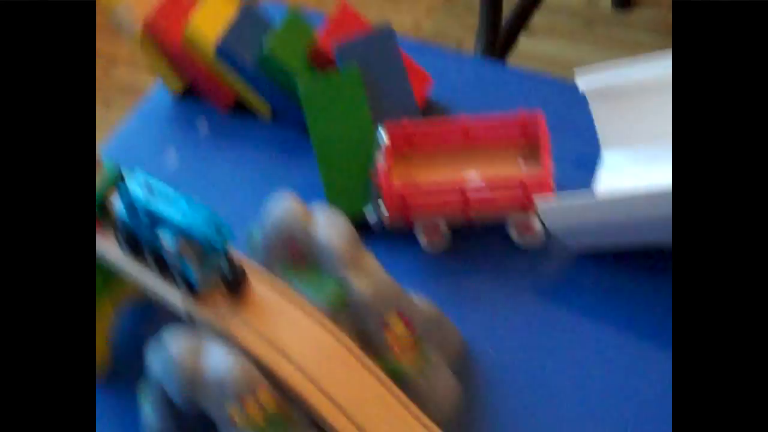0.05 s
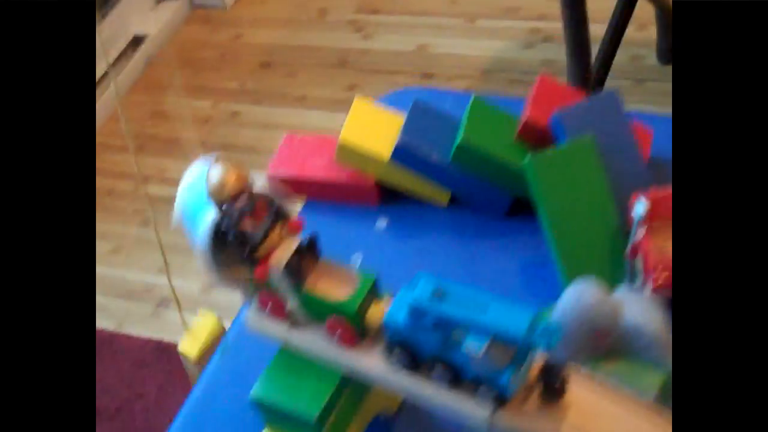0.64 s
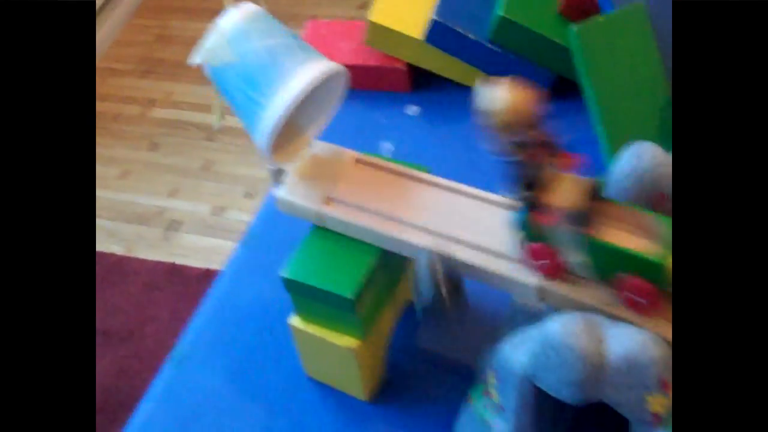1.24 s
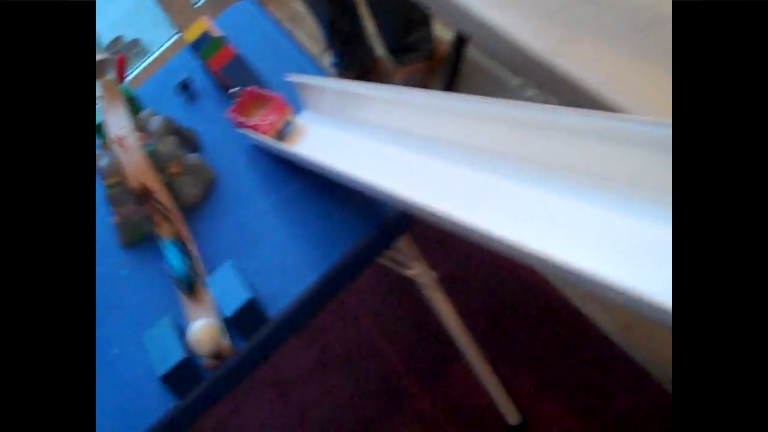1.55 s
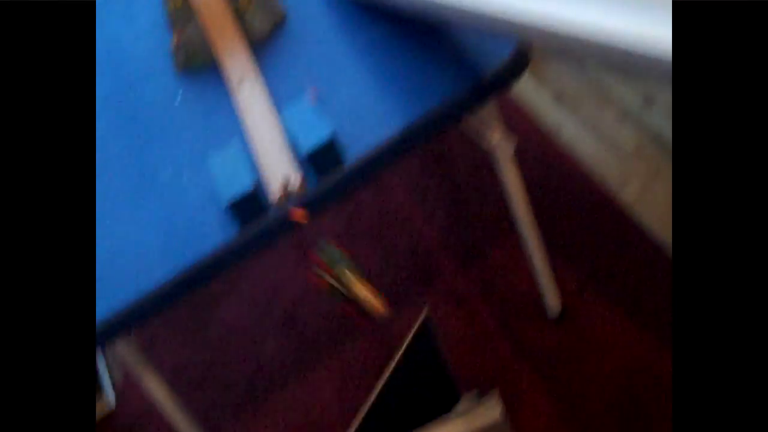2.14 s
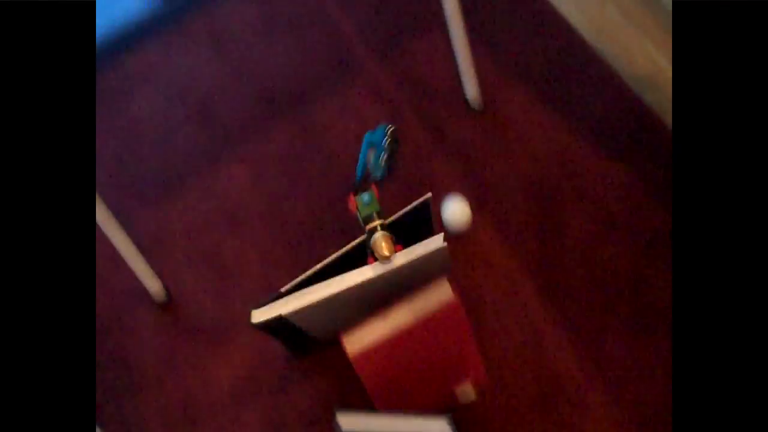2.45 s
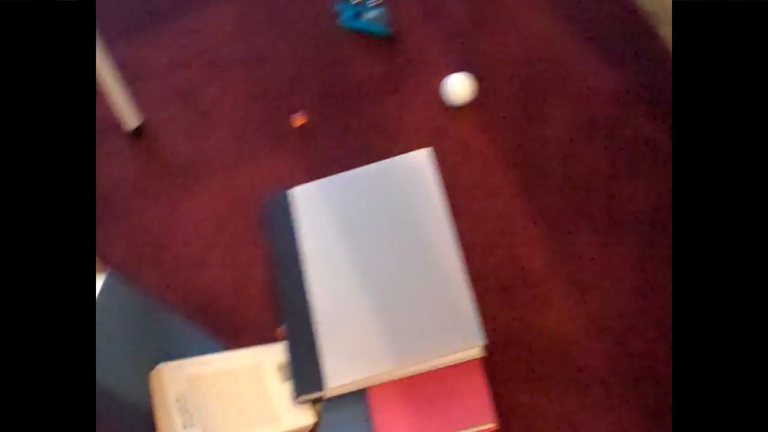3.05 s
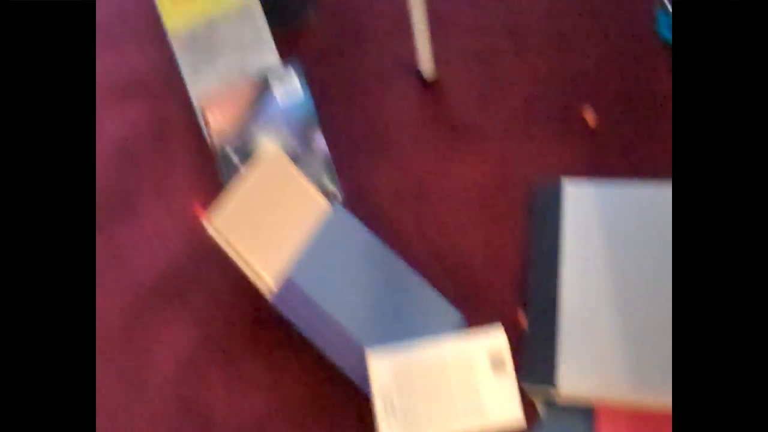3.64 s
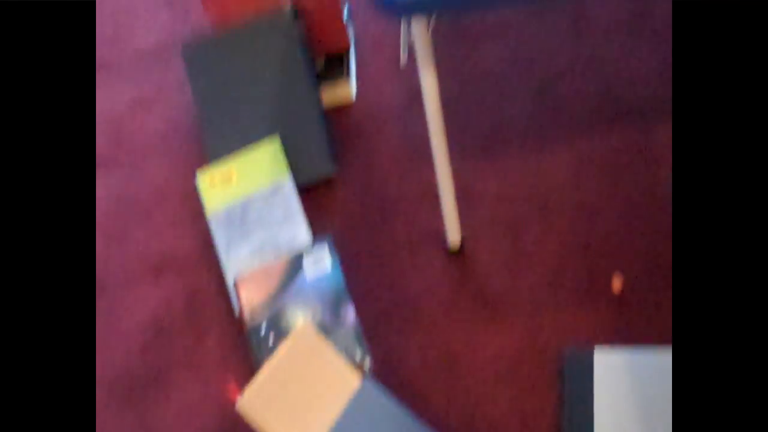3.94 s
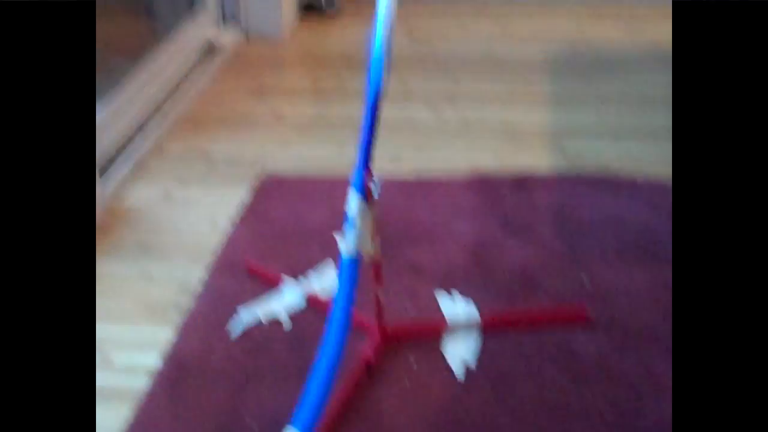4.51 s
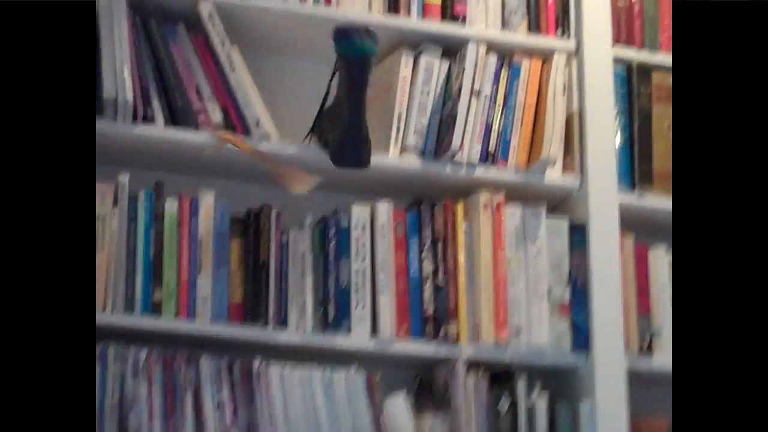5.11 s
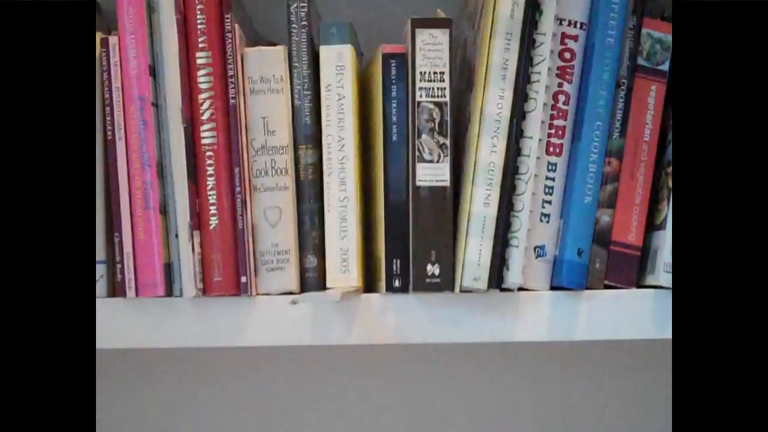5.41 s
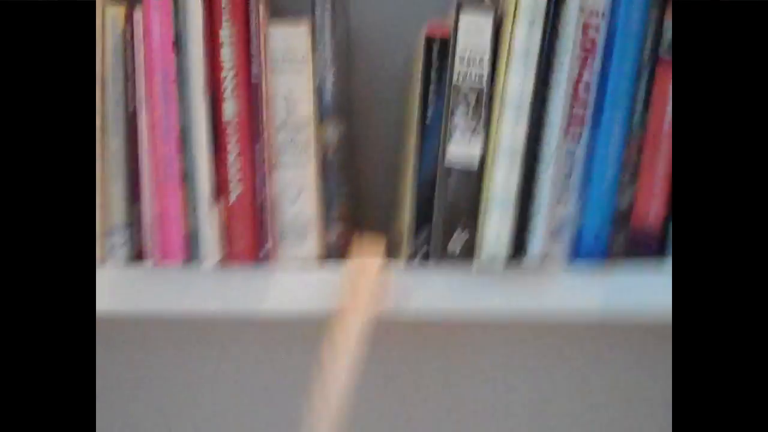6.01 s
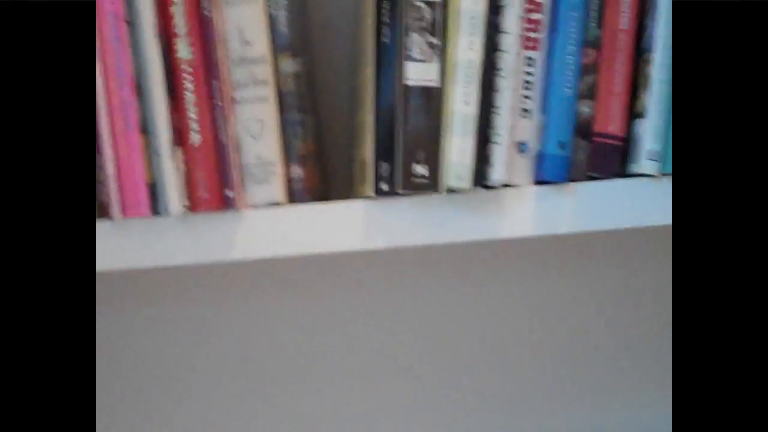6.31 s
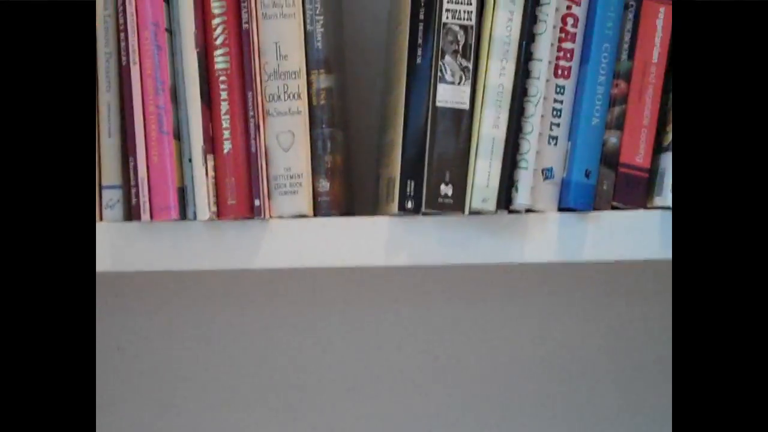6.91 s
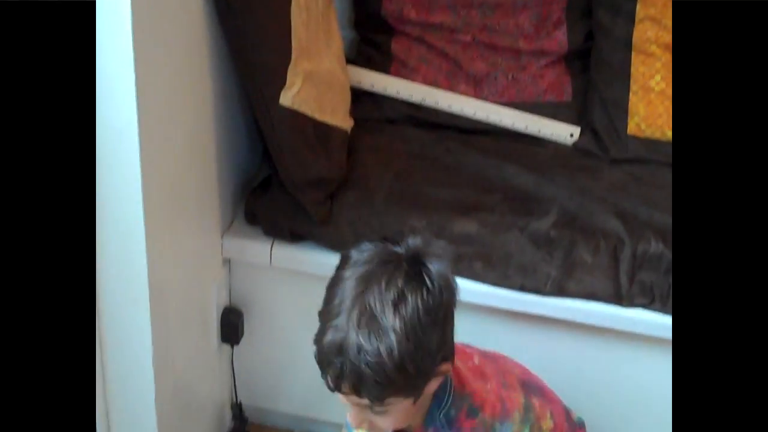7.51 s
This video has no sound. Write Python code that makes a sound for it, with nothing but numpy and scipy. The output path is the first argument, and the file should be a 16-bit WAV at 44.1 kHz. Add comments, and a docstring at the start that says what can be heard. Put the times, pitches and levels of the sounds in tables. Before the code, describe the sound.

A household chain reaction starts with knocking blocks, small clicks and the rattle of toy wagons and a ball rolling over wood. Then books topple onto carpet in an uneven run of thuds, ending in low booms. A sharp balloon pop rings through the room, followed by a tumbling book, a clattering wooden stick and a soft rustle of clothing. The stereo microphone is close, with light hiss and slight overload on loud blows.

```python
"""Chain reaction in a living room

Blocks topple and a toy train rolls over a play table, toys clack off it, books fall like dominoes
on the carpet, a balloon bursts, a book and a wooden stick tumble from a shelf; then clothes rustle.
Each blow is a cluster of dying modes with the room's answer behind it. The stereo microphone is
hand-held, close to the action, and overloads on the loud blows."""
import sys
import numpy as np
from scipy import signal
from scipy.fft import rfft, irfft, next_fast_len
from scipy.io import wavfile
from scipy.ndimage import map_coordinates

SR = 44100
rng = np.random.default_rng(int(sys.argv[2]) if len(sys.argv) > 2 else 0)


def transcribe(signal):
    """Save signal, clipped to [-1, 1], as a 16-bit WAV file at the path in sys.argv[1]."""
    frames = np.atleast_2d(signal).T
    limited = np.clip(frames, -1, 1)
    pcm = np.round(limited * 32767).astype(np.int16)
    wavfile.write(sys.argv[1], SR, pcm)


N = 342204
TIME = np.arange(N) / SR
AGE = np.arange(SR // 2) / SR  # time since a blow [s]
# the knock of wood or a book's board: (frequency [Hz], level [dB])
KNOCK_SPECTRUM = [(150, -37), (380, -1), (520, 1), (1200, 0), (2500, -5), (3300, -8), (6000, -37)]


def toys():
    """Blocks knock on the play table, the creeping train ticks, wagons and ball clack down and off it."""
    # blocks and train: (time [s], strength [dB], hardness [dB], knock [Hz], relative table thud [dB])
    knocks = [(.074, -22, -8, 2350, -0.5), (0.0924, -9, 3.5, 2440, -18), (.128, -14.5, -13.5, 496, -9),
              (.194, -8, -5, 1786, -6.5), (.231, -14, -8, 1750, -9.5), (1.163, -1, 1, 2734, -18.5),
              (1.189, -8.5, 0, 520, -11), (1.285, -13, -4, 1710, -3), (1.299, -1.5, -0.5, 999, -18.5),
              (1.382, -12.5, -8.5, 944, -6)]
    # couplings and wheels: (time [s], strength [dB], hardness [dB], click [Hz])
    ticks = [(.412, -35, 12, 3430), (0.5493, -25.5, 32, 6930), (.557, -34.5, 38, 6840),
             (.6696, -25, 13.5, 7400), (.674, -24, 16, 7800), (.748, -39, 14, 4600),
             (0.8396, -6.5, 27, 7350), (0.8444, -10.5, 24, 6780), (.861, -20, 10, 5800),
             (.93, -17, 5.5, 6430), (.936, -24, -2.5, 6860), (.964, -15, 17.5, 6800), (1.041, -26, 3, 7140),
             (1.0636, -19.5, 0.5, 4940), (1.15, -29, 12, 6800)]
    # wagons and ball: (time [s], strength [dB], hardness [dB], knock [Hz], click [Hz])
    clacks = [(1.504, -17.5, -3, 2590, 5590), (1.538, -12.5, 1, 2560, 7410), (1.57, -17.5, -5, 2640, 7780),
              (1.621, -15, 19.5, 520, 3620), (1.636, -10, 12, 1980, 6640), (1.687, -5.5, 4, 2766, 3690),
              (1.759, -11.5, -6.5, 1776, 3400), (1.899, -16, -8.5, 2542, 6840),
              (1.986, -19.5, 0, 1490, 3570), (2.005, -17.5, 6, 2020, 5000), (2.033, -8, 29, 1860, 7350),
              (2.061, -14.5, 9, 780, 7570), (2.142, -26.5, -6, 1890, 7280), (2.181, -14, 17.5, 2480, 6790),
              (2.19, -13, 23.5, 2480, 7700), (2.23, -7, 6.5, 2822, 6600), (2.396, -17, -12, 1383, 6470),
              (2.48, -14.5, 21, 1740, 7900), (2.486, -20, 19, 1750, 7400)]
    out = np.zeros((2, N))
    for s, db, hardness_db, knock_hz, thud_db in knocks:
        knock = toy_hit(hardness_db, knock_hz, click_hz=2892, thud_db=thud_db,
                        base_life=.081, shorten=.35, ring_db=-11.5, ring_life=.67)
        add(out, s, amp(db) * knock, room_share(-6, db))
    for s, db, hardness_db, click_hz in ticks:
        tick = toy_hit(hardness_db, knock_hz=1883, click_hz=click_hz, thud_db=-9.5,
                       base_life=.021, shorten=.12, ring_db=-5, ring_life=.52)
        add(out, s, amp(db) * tick, room_share(-12.5, db))
    for s, db, hardness_db, knock_hz, click_hz in clacks:
        clack = toy_hit(hardness_db, knock_hz, click_hz, thud_db=-25,
                        base_life=.064, shorten=.04, ring_db=-7.5, ring_life=.82)
        add(out, s, amp(db) * clack, room_share(-1.5, db))
    return out


def toy_hit(hardness_db, knock_hz, click_hz, thud_db, base_life, shorten, ring_db, ring_life):
    """Hardness shifts a blow from knock to click and shortens it; the table top booms under it."""
    # the table top's main modes: (frequency [Hz], level [dB], t60 [s])
    top_modes = [(206, 1, 0.24), (324, -13, 0.26), (423, -8, 0.31), (485, -7.5, 0.16), (510, -17.5, 0.18)]
    # its dense modes, and the toy's click: (frequency [Hz], level [dB])
    top_spectrum = [(60, -49), (110, -31), (180, 6), (500, 3), (750, -26), (2000, -79.5)]
    click_spectrum = [(1200, -44), (2300, -2.5), (3000, -1.5), (5000, 3), (7500, 5), (9000, -5),
                      (13000, -16.5), (16000, -29)]
    life = base_life * amp(-shorten * hardness_db)
    top = amp(-.5) * ring(top_modes, scatter_db=4) + amp(-1) * cluster(top_spectrum, .13, .00062)
    thud = amp(thud_db) * lowcut(top, hz=135, order=3)
    knock = contact(KNOCK_SPECTRUM, 1.39 * life, .0001, knock_hz, 5, ring_db, ring_life)
    click = contact(click_spectrum, .64 * life, .00005, click_hz, 7.5, ring_db, 1.6 * ring_life)
    return (thud + knock + amp(hardness_db) * click) / np.hypot(1, amp(hardness_db))


def books():
    """Books and props fall on the carpet; hardness tilts each fall from thud to slap."""
    # falls: (time [s], strength [dB], hardness [dB], thud [Hz], knock t60 [s])
    falls = [(2.3964, -21.5, 3, 474, 0.04), (2.61, -28, 5.5, 362, 0.07), (2.671, -28.5, 15.5, 425, 0.17),
             (2.736, -24, 4, 420, 0.48), (2.759, -13.5, 4.5, 197, 0.018), (2.766, -15, 7, 400, 0.041),
             (2.82, -30.5, 21.5, 367, .08), (2.877, -36, -4, 340, .06), (2.954, -39.5, 13, 384, 0.08),
             (3.004, -37.5, 18, 378, 0.13), (3.105, -35, 7, 310, 0.16), (3.134, -16, 6, 425, 0.27),
             (3.17, -24.5, -4.5, 560, .15), (3.294, -40.5, 26.5, 310, .04), (3.37, -34.5, 12, 370, 0.063),
             (3.409, -30.5, -7.5, 390, 0.012), (3.491, -23, -11.5, 340, 0.039), (3.515, -30, -5, 148, 0.15),
             (3.656, -49, -32, 357, 0.15), (3.783, -34, -16, 287, 0.13), (4.231, -23.5, -1.5, 253, 0.11),
             (4.254, -34.5, 28, 330, .08), (4.446, -23.5, -13, 272, 0.03), (4.453, -18, 6.5, 293, 0.32),
             (4.47, -27, 23.5, 300, .12), (4.488, -26.5, 3.5, 560, .016), (4.505, -18, -6, 283, 0.029),
             (4.544, -17.5, -7.5, 320, 0.015), (4.661, -39, 15.5, 208, 0.48), (4.819, -19, -5, 219, 0.32),
             (5.277, -39, 2, 236, .16), (5.375, -42, -8, 327, .19), (7.052, -50.5, -10, 170, .03)]
    out = np.zeros((2, N))
    for s, db, hardness_db, hz, t60 in falls:
        fall = landing(thud_db=-hardness_db / 2, thud_hz=hz, thud_t60=.21, knock_db=-.5,
                       knock_hz=2.52 * hz, knock_t60=t60, peak_db=3.5, slap_db=hardness_db / 2)
        add(out, s, amp(db) * fall, room_share(-9.5, db))
    return out


def balloon():
    """The skin rips with a bang that leaves the whole room ringing."""
    # the burst, and the room ringing after it: (frequency [Hz], level [dB])
    burst_spectrum = [(18, -46), (30, -18), (243, 1), (365, -3.5), (534, -1.5), (745, -6.5), (1630, -3),
                      (2390, -11.5), (7660, -6.5), (8840, -15), (11500, -24), (19400, -120)]
    ringing_spectrum = [(88, -33), (150, -12.5), (246, 1.5), (312, -8), (455, -34), (708, 0), (826, -5.5),
                        (1500, 1), (3070, -12), (7200, -7), (8840, -17.5), (11500, -36.5), (19400, -120)]
    bang = amp(7) * cluster(burst_spectrum, t60=.11, attack=.0002)
    ringing = amp(-10.5) * cluster(ringing_spectrum, t60=1.24, attack=.013)
    out = np.zeros((2, N))
    add(out, 4.971, bang + ringing, room_db=-12.5)
    return out


def shelf_book():
    """A book tumbles off its shelf, thudding at one pitch over the low note of the shelf board."""
    # tumbles: (time [s], strength [dB], hardness [dB], knock [Hz])
    tumbles = [(5.515, -29, -4, 500), (5.551, -10.5, 7.5, 920), (5.62, -6, 20, 450),
               (5.778, -14.5, -1, 446), (5.923, -18, -17.5, 480), (6.116, -35, 3, 555)]
    out = np.zeros((2, N))
    for s, db, hardness_db, hz in tumbles:
        book = landing(thud_db=-hardness_db / 2, thud_hz=420, thud_t60=.038, knock_db=-4,
                       knock_hz=hz, knock_t60=.06, peak_db=10, slap_db=hardness_db / 2)
        board = amp(-14 - hardness_db / 2) * thump(hz=177, t60=.096)
        add(out, s, amp(db) * (book + board), room_share(-2, db))
    return out


def stick():
    """A wooden stick falls and knocks about, ringing longer on the soft bounces."""
    # bounces: (time [s], strength [dB], hardness [dB], knock [Hz])
    bounces = [(6.251, -27.5, -18, 720), (6.267, -5, 0, 620), (6.297, -16.5, -2.5, 500),
               (6.406, -34, -12, 670), (6.457, -14, -12, 696), (6.472, -17, 4, 413),
               (6.595, -26.5, -10, 670), (6.629, -20, -23, 544), (6.656, -31, -8, 620),
               (6.674, -28.5, -6, 452), (6.762, -21, -5, 586), (6.888, -16.5, 12, 450),
               (7.071, -34, 7, 505)]
    out = np.zeros((2, N))
    for s, db, hardness_db, hz in bounces:
        bounce = landing(thud_db=-12, thud_hz=464, thud_t60=.11, knock_db=-1.5, knock_hz=hz,
                         knock_t60=.11 * amp(-.12 * hardness_db), peak_db=15, slap_db=hardness_db)
        add(out, s, amp(db) * bounce, room_db=-7)
    return out


def landing(thud_db, thud_hz, thud_t60, knock_db, knock_hz, knock_t60, peak_db, slap_db):
    """A book or stick lands: a soft thud, the knock of its body and the slap of its face."""
    # the slap: (frequency [Hz], level [dB])
    slap_spectrum = [(1200, -27), (2300, -7.5), (3000, -2.5), (5000, 0.5), (7500, 5.5), (9000, -6.5),
                     (13000, -20), (16000, -25)]
    knock = cluster(KNOCK_SPECTRUM, knock_t60, .0001, knock_hz, peak_db, q=5.7)
    slap = cluster(slap_spectrum, .66 * knock_t60, .0001)
    return amp(thud_db) * thump(thud_hz, thud_t60) + amp(knock_db) * knock + amp(slap_db) * slap


def booms():
    """A deep boom hangs on after the heaviest falls: two low modes in a rough rumble."""
    # heavy falls: (time [s], level [dB])
    falls = [(4.6, -18.5), (4.835, -14), (2.77, -34.5)]
    # the boom's modes: (frequency [Hz], level [dB], t60 [s])
    deep_modes = [(107.2, 10.5, 0.67), (147, -5, 0.28)]
    out = np.zeros((2, N))
    for s, db in falls:
        boom = amp(-7) * ring(deep_modes, scatter_db=3) + thump(hz=150, t60=.32)
        add(out, s, amp(db) * boom, room_db=-8.5)
    return out


def deep_thumps():
    """A short, deep thump under the hardest blows."""
    # thumps: (time [s], level [dB])
    thumps = [(1.164, -32), (1.301, -21.5), (1.381, -46), (2.76, -33), (5.62, -33), (6.267, -37)]
    # their bass: (frequency [Hz], level [dB])
    thump_spectrum = [(15, -17), (40, 11), (90, -8), (160, -21), (400, -39)]
    out = np.zeros((2, N))
    for s, db in thumps:
        add(out, s, amp(db) * cluster(thump_spectrum, t60=.061, attack=.002), room_db=-15)
    return out


def rolling():
    """Wheels and ball cross the wooden track in a run of tiny bumps, and the table top drones."""
    # two runs: (time [s], rumble [dB], rattle [dB])
    first_run = [(0.0, -33.5, -39.5), (0.134, -25.5, -32), (0.22, -20.5, -30), (0.34, -42, -35.5),
                 (0.45, -71, -45)]
    second_run = [(0.87, -31.5, -28), (1.04, -32.5, -32), (1.172, -34, -43.5), (1.334, -20.5, -25),
                  (1.526, -25.5, -20), (1.948, -26.5, -27.5), (2.122, -27.5, -33.5), (2.4, -43.5, -39)]
    # the track's rumble and the wheels' rattle: (frequency [Hz], level [dB])
    track_spectrum = [(47, -44), (80, -25), (301, 1.5), (476, -3.5), (552, 7.5), (619, -3), (831, -1),
                      (932, -3), (1230, -8.5), (2450, -11), (4000, -28.5), (5200, -49), (8800, -120)]
    rattle_spectrum = [(1200, -14), (2500, -0.5), (5000, 1), (7500, 0.5), (9000, -16), (13000, -35),
                       (16000, -33)]
    # resonances of track and table top: (frequency [Hz], width [Hz], level [dB])
    track_peaks = [(556, 26, 9), (1645, 180, 0), (2380, 39, -21), (2720, 35, -31.5)]
    top_peaks = [(209.4, 35, 0)]
    # a wagon or a prop scrapes along: (time [s], level [dB], half length [s])
    scrapes = [(1.897, -18.5, 0.02), (4.41, -43, 0.023)]
    bumps_per_s, hiss_power = 170, .05  # the hiss carries on between bumps
    rumble, rattle = amp([[2.5], [-1]]) * levels(first_run) + amp([[0], [-2]]) * levels(second_run)
    onsets = rng.random(N) < bumps_per_s / SR
    bumps = onsets * amp(3 * rng.exponential(size=N).clip(0, 3))

    def roughness(t60):
        """A gain that jumps at each bump and dies away."""
        power = signal.fftconvolve(bumps ** 2, fade(t60, .00018) ** 2)[:N]
        return unit(np.sqrt(np.abs(power) + hiss_power))

    wood = rush(track_spectrum) + amp(-8) * resonant(track_peaks) + amp(-13.5) * resonant(top_peaks)
    rumbling = rumble * wood * roughness(t60=.078)
    rattling = (rattle + swells(scrapes)) * rush(rattle_spectrum) * roughness(t60=.016)
    return rumbling + rattling


def jingle():
    """A small loose metal part tings very high when jolted and shakes in between."""
    # tings, and the course of the shaking: (time [s], level [dB])
    tings = [(.105, -43), (0.311, -38), (.329, -39), (.432, -34.5)]
    shaking = [(.29, -43), (.33, -20.5), (.365, -38), (.54, -43.5)]
    # the part's modes: (frequency [Hz], level [dB], t60 [s])
    metal_modes = [(11430, 1, 0.1), (12080, -9, 0.22)]
    # its fizz as it shakes: (frequency [Hz], level [dB])
    fizz_spectrum = [(5000, -16.5), (8000, 9), (10000, -5), (11600, -3), (13000, -8), (16000, -25)]
    out = levels(shaking)[0] * rush(fizz_spectrum) * flutter(depth_db=3.6, rate=250)
    for s, db in tings:
        add(out, s, amp(db) * ring(metal_modes, scatter_db=2) * np.ones((2, 1)), room_db=-9)
    return out


def cup():
    """A cup answers each nudge with a short hollow note from two close wall modes."""
    # nudges: (time [s], level [dB], pitch [Hz])
    nudges = [(.412, -40, 1340), (.548, -38, 1340), (.571, -41, 1270), (.668, -29, 1250)]
    out = np.zeros((2, N))
    for s, db, hz in nudges:
        note = ring([(hz, 0, .06), (1.09 * hz, -7, .04)], scatter_db=1)
        add(out, s, amp(db) * note * np.ones((2, 1)), room_db=-10)
    return out


def covers():
    """Book covers rub unevenly as they slide over each other."""
    # the slide: (time [s], level [dB])
    slide = [(2.42, -46.5), (2.652, -34.5), (2.786, -28), (3.068, -38), (3.212, -40.5), (3.714, -63),
             (3.866, -61), (4.2, -50)]
    # cover on cover: (frequency [Hz], level [dB])
    cover_spectrum = [(80, -51), (200, -12.5), (370, -3.5), (550, -6.5), (900, -21.5), (2000, -21),
                      (7000, -48), (12000, -39)]
    return amp(-1) * levels(slide)[0] * rush(cover_spectrum) * flutter(depth_db=2.3, rate=49)


def clothes():
    """Someone's clothes rustle in a few short strokes at the end."""
    # strokes: (time [s], level [dB], half length [s])
    strokes = [(7.22, -36, 0.069), (7.325, -37.5, 0.042), (7.43, -40.5, 0.08), (7.578, -39.5, 0.025),
               (7.75, -41, 0.046)]
    # rubbing cloth: (frequency [Hz], level [dB])
    cloth_spectrum = [(88, -52), (150, -23), (194, -2), (410, 3), (447, 7), (521, -8), (884, 6.5),
                      (1080, -3), (2340, -2), (8840, 1), (11500, -33), (19400, -120)]
    return swells(strokes) * rush(cloth_spectrum) * flutter(depth_db=1.6, rate=80)


def room_tone():
    """Living-room air and microphone hiss."""
    # the noise floor: (frequency [Hz], level [dB])
    air_spectrum = [(25, -5), (80, -7.5), (220, 3.5), (450, -2.5), (1000, -2), (2500, -9), (4500, -11),
                    (7400, -2), (9000, -14), (13000, -17.5), (16000, -42.5)]
    return amp(-46.5) * rush(air_spectrum)


def room(x):
    """The living room's answer to one blow, each frequency dying at its own speed."""
    # reverberation: (frequency [Hz], t60 [s])
    decay_times = [(100, 0.19), (500, 0.51), (1500, 0.53), (4000, 0.38), (7000, 0.42), (13000, 0.36)]
    hz, t, bins = signal.stft(noise(np.ones_like, SR // 2), SR, nperseg=256)
    decay = amp(-60 * t / along(decay_times, hz)[:, None])
    tail = signal.istft(bins * decay, SR, nperseg=256)[1]
    tail *= 1 - np.exp(-(TIME[:tail.shape[1]] / .0078) ** 2)  # the first walls answer after a few ms
    return signal.fftconvolve(x, tail / np.linalg.norm(tail[0]), axes=1)


def room_share(base_db, db):
    """Room ring relative to the hit, base_db at a strength of -22 dB; louder blows sound drier."""
    return base_db - .44 * (db + 22)


def add(out, s, x, room_db):
    """Put a sound and its room answer at time s, lasting at most until the next stop."""
    # moments when all earlier blows stop ringing abruptly: (time [s])
    stops = [4.283, 5.45]
    heard = amp(room_db) * room(x)
    heard[:, :x.shape[1]] += x
    start = round(s * SR)
    end = min([round(stop * SR) for stop in stops if stop > s] + [N])
    heard = heard[:, :end - start]
    out[:, start:start + heard.shape[1]] += heard


def thump(hz, t60):
    """A soft, heavy contact: a broad hump of low modes around its pitch."""
    # the hump: (frequency [multiple of the pitch], level [dB])
    hump = [(.08, -30), (.25, -20), (.55, -5), (1, 0), (1.6, -12.5), (3, -24), (7, -60.5)]
    modes = cluster(np.array(hump) * [hz, 1], t60, attack=.00072)
    return blow(lowcut(modes, hz=80, order=2))


def contact(spectrum, t60, attack, hz, peak_db, ring_db, ring_life):
    """A hard contact: a dense clatter of modes and one clear mode at its resonance."""
    clatter = cluster(spectrum, t60, attack, hz, peak_db, q=3)
    return clatter + amp(ring_db) * ring([(hz, 0, ring_life * t60 + .0099)], scatter_db=0)


def cluster(spectrum, t60, attack, hz=1000, peak_db=-100, q=1):
    """Many close modes dying together, with an optional resonance at hz."""
    resonance = lambda f: np.hypot(1, amp(peak_db) / np.hypot(1, 2 * q * (f - hz) / hz))
    modes = noise(lambda f: amp(along(spectrum, f)) * resonance(f), len(AGE))
    return blow(modes * fade(t60, attack))


def ring(modes, scatter_db):
    """Separate modes, struck with new strengths and phases each time."""
    out = np.zeros(len(AGE))
    for hz, db, t60 in modes:
        envelope = amp(db + scatter_db * rng.normal()) * fade(t60, attack=.00021)
        out += envelope * np.sin(2 * np.pi * (hz * AGE + rng.random()))
    return blow(out)


def fade(t60, attack):
    """The envelope of a blow; both times in seconds."""
    return amp(-60 * AGE / max(t60, .002)) * (1 - np.exp(-AGE / attack))


def blow(x):
    """Scale a short sound to the energy of 20 ms at rms 1."""
    return x / np.sqrt(np.mean(x ** 2) * x.shape[-1] / (.02 * SR))


def lowcut(x, hz, order):
    """Take away the deep bass below hz."""
    return signal.sosfilt(signal.butter(order, hz, "high", fs=SR, output="sos"), x)


def noise(colour, size):
    """Stereo noise of rms 1; the two capsules differ most in the deep bass and the treble."""
    # stereo width: (frequency [Hz], side level [dB])
    width = [(60, -1), (200, -22), (600, -18.5), (1400, -11), (3000, -5.5), (6000, -1.5), (12000, -3)]
    white = rng.standard_normal((2, size))
    mid, side = filtered(white, lambda f: colour(f) * np.array([np.ones_like(f), amp(along(width, f))]))
    return unit(np.array([mid + side, mid - side]))


def rush(spectrum):
    """Lasting noise with this spectrum."""
    return noise(lambda f: amp(along(spectrum, f)), N)


def resonant(peaks):
    """Lasting noise in narrow resonances."""
    return noise(lambda f: sum(amp(db) / (1 + (2 * (f - hz) / width) ** 2) for hz, width, db in peaks), N)


def levels(rows):
    """A gain per sample for each dB column, silent outside the rows' times."""
    times, *columns = np.transpose(rows)
    return [amp(np.interp(TIME, times, db, left=-120, right=-120)) for db in columns]


def swells(rows):
    """A gain that rises and falls smoothly around each row's time."""
    return sum(amp(db) * np.exp(-((TIME - s) / half) ** 2) for s, db, half in rows)


def flutter(depth_db, rate):
    """A smooth random gain, rate knots a second."""
    knots = rng.standard_normal(int(N * rate / SR) + 4)
    return amp(depth_db * map_coordinates(knots, [TIME * rate]))


def filtered(x, response):
    """Shape x by a response of frequency."""
    n = x.shape[-1]
    padded = next_fast_len(n + SR // 20, True)
    return irfft(rfft(x, padded) * response(np.fft.rfftfreq(padded, 1 / SR)), padded)[..., :n]


def along(points, hz):
    """Interpolate (frequency [Hz], value) points on a log axis."""
    freqs, values = np.transpose(points)
    return np.interp(np.log(hz + 1), np.log(freqs + 1), values)


def amp(db):
    """Decibels to gain."""
    return 10 ** (np.asarray(db) / 20)


def unit(x):
    """Scale to rms 1."""
    return x / np.sqrt(np.mean(x ** 2) + 1e-20)


def scene():
    """The chain reaction from the first block to the last rustle."""
    blows = toys() + deep_thumps() + cup() + jingle() + books() + booms() + balloon()
    return blows + shelf_book() + stick() + rolling() + covers() + clothes() + room_tone()


def record(dry):
    """Close stereo microphone, left side brighter and later; loud blows overload; one brief dropout."""
    # balance of the capsules: (frequency [Hz], left over right [dB])
    balance = [(100, -0.5), (3000, 0), (5500, -2.5), (7500, 6.5), (9500, 14), (13000, 10)]
    # the dropout: (start [s], end [s])
    dropout = (5.45, 5.512)
    left_lag_s, top_hz, top_edge_hz = 1.3e-5, 14800, 700
    sides = np.array([[.5], [-.5]])

    def capsules(f):
        """Left and right response, their total power the same at every frequency."""
        gain = amp(sides * along(balance, f))
        delay = np.exp(-2j * np.pi * f * sides * left_lag_s)
        return gain / np.sqrt(np.mean(gain ** 2, axis=0)) * delay

    x = filtered(dry, capsules)
    x = np.clip(x + .019 * np.minimum(x ** 2, 2), -1, 1)  # lopsided overload: a low push under hard blows
    x *= (TIME < dropout[0]) | (TIME > dropout[1])
    return filtered(x, lambda f: np.clip((top_hz - f) / top_edge_hz + .5, 0, 1))


dry = scene()
out = record(dry)
transcribe(out)
```